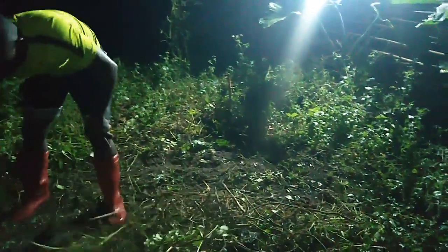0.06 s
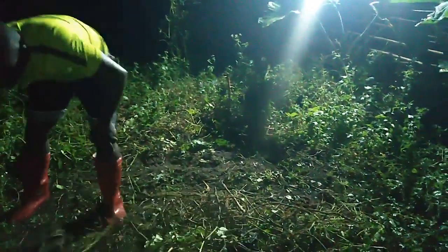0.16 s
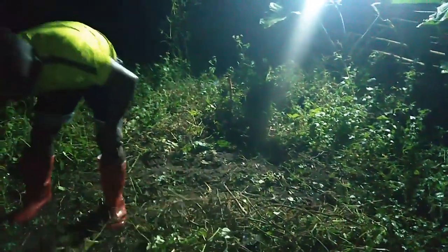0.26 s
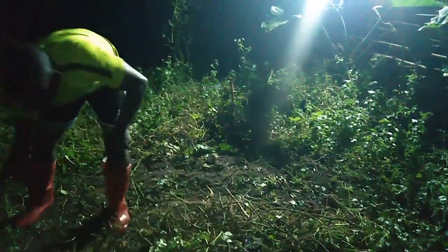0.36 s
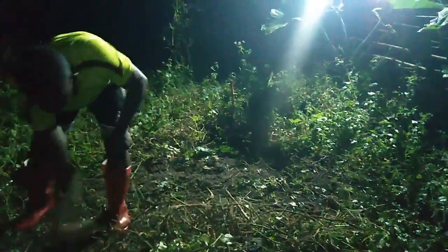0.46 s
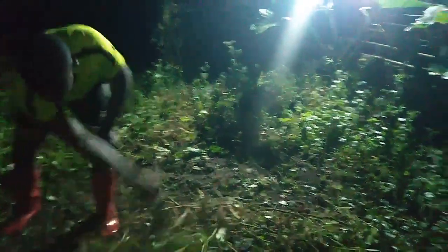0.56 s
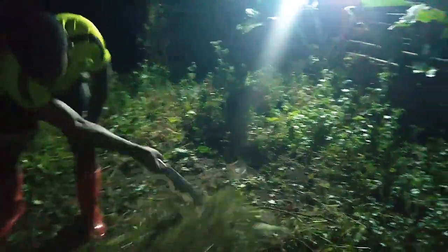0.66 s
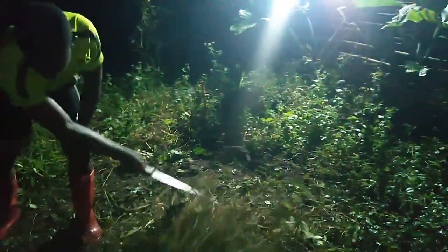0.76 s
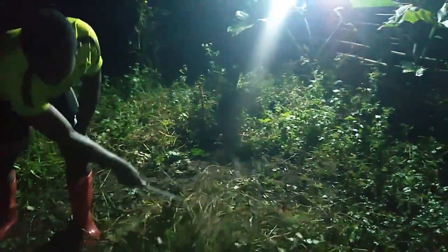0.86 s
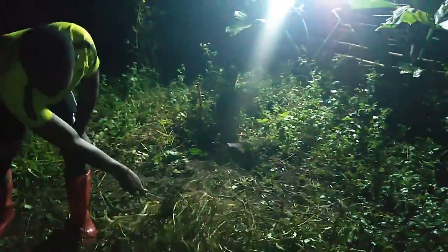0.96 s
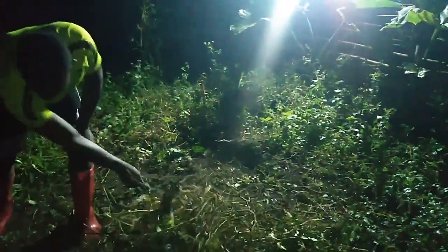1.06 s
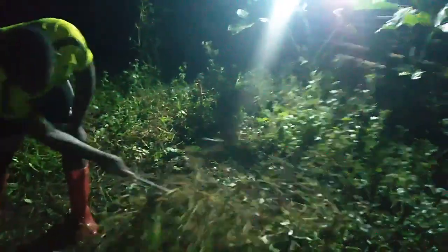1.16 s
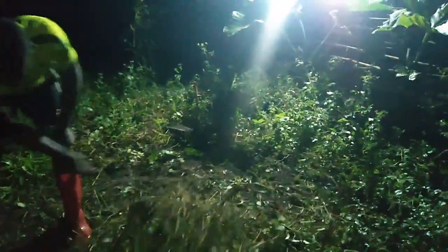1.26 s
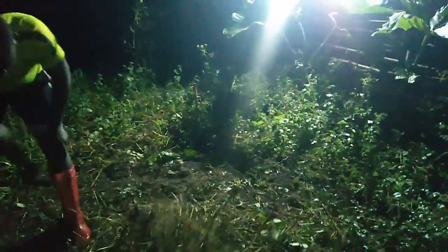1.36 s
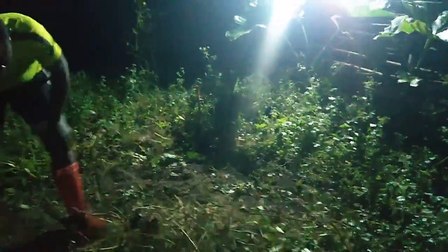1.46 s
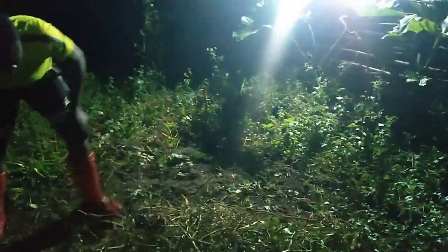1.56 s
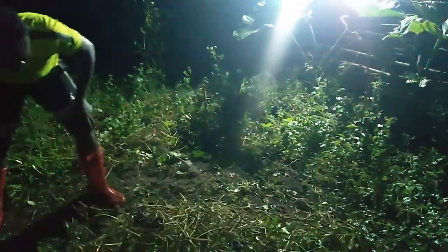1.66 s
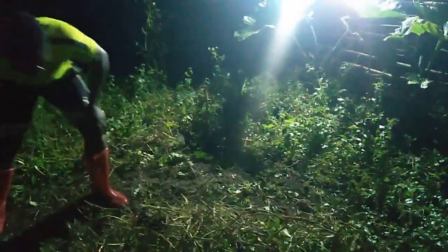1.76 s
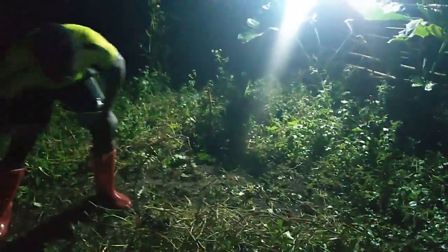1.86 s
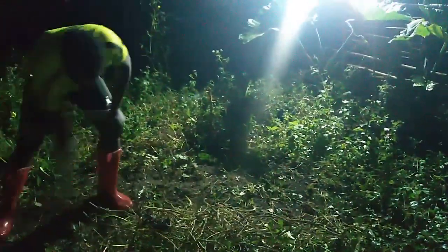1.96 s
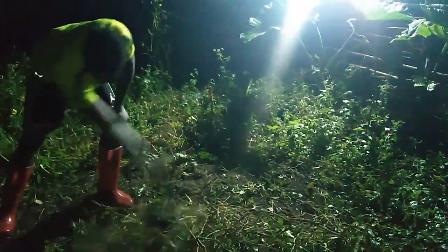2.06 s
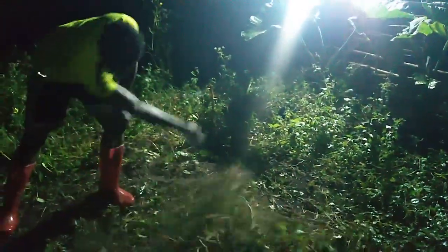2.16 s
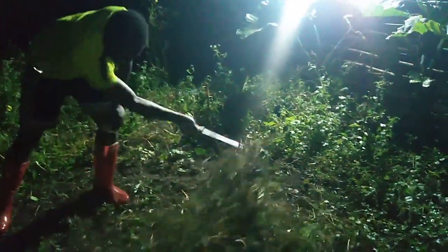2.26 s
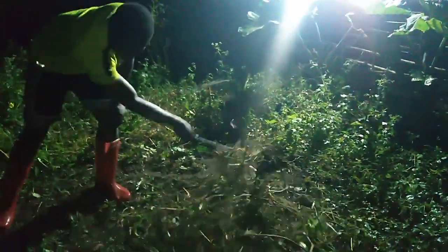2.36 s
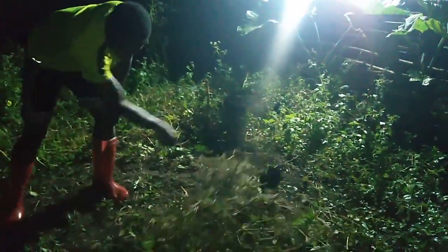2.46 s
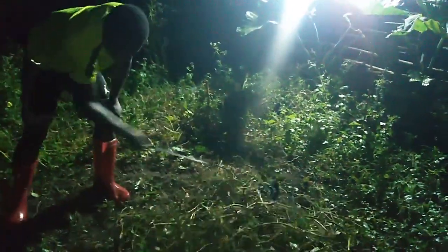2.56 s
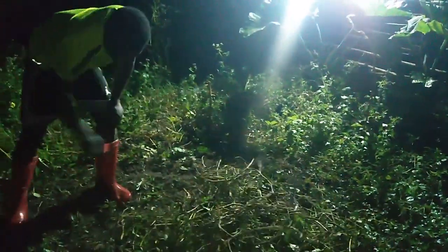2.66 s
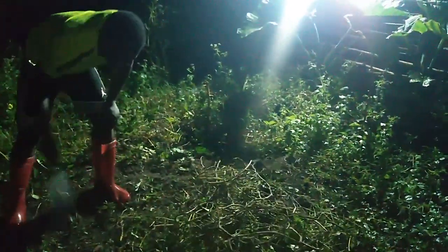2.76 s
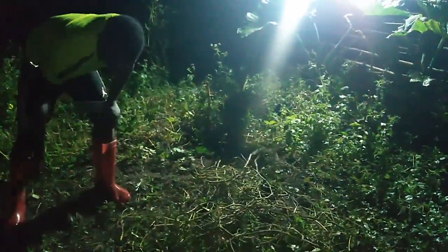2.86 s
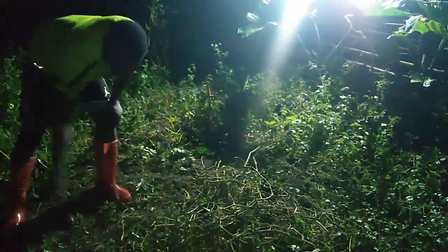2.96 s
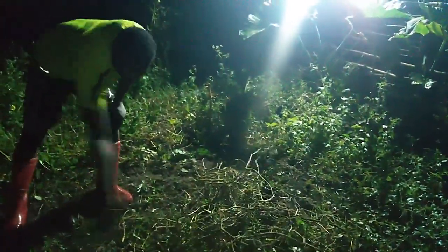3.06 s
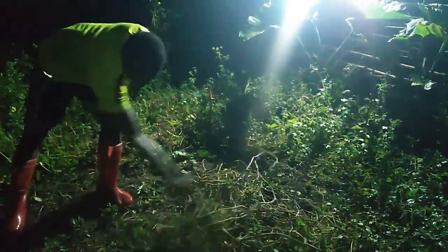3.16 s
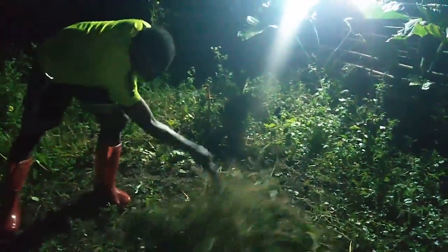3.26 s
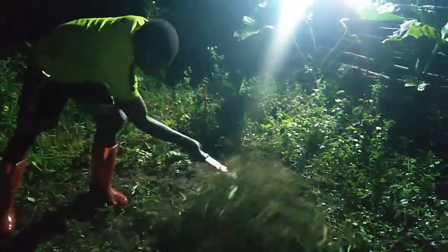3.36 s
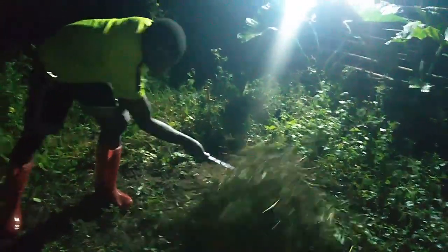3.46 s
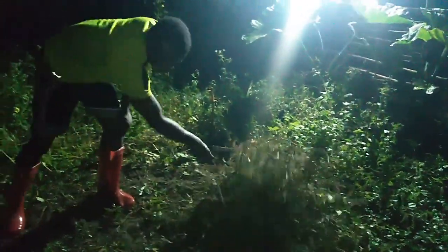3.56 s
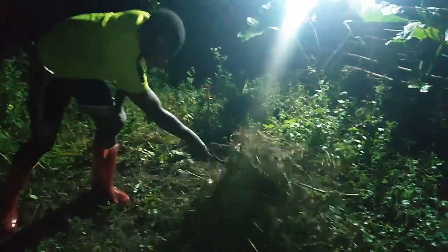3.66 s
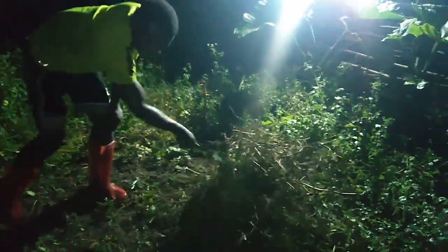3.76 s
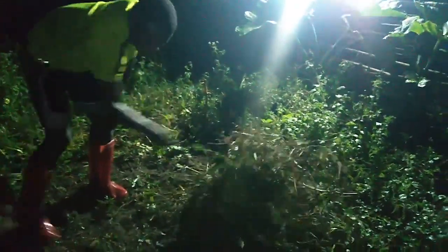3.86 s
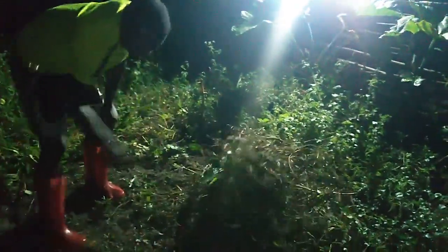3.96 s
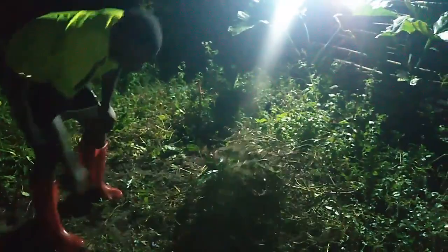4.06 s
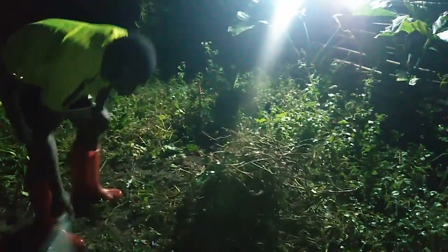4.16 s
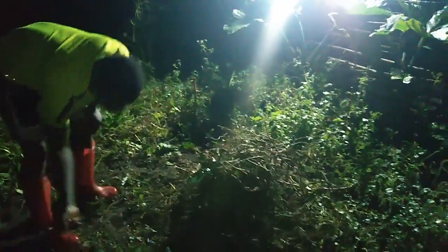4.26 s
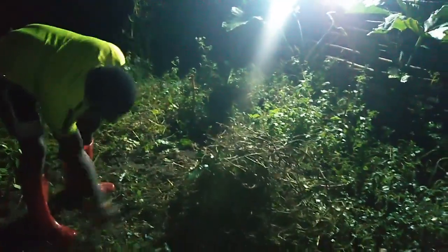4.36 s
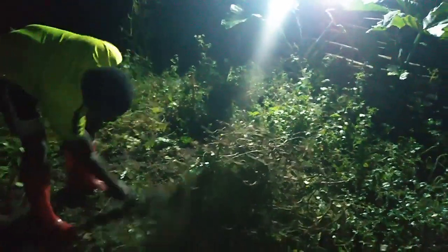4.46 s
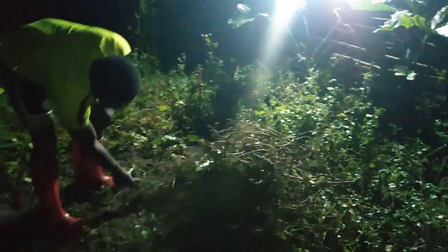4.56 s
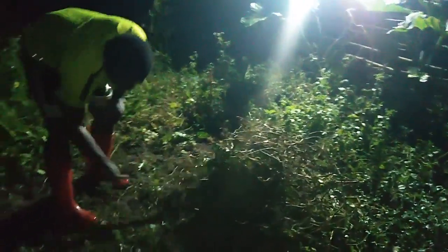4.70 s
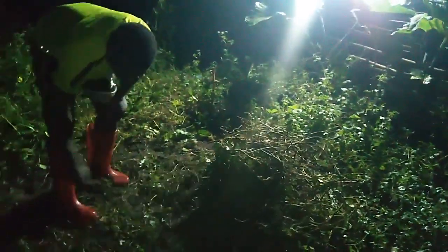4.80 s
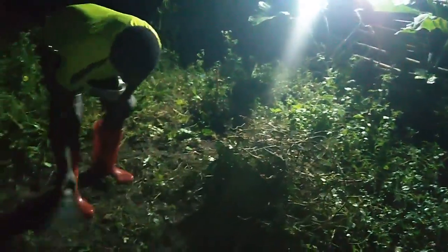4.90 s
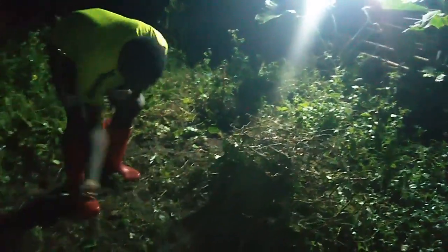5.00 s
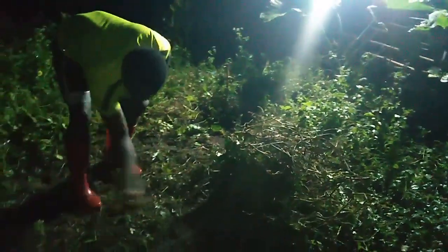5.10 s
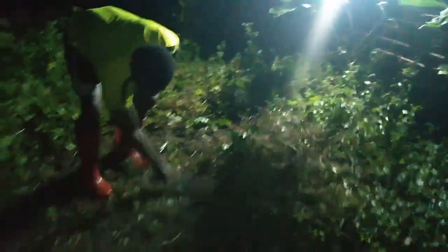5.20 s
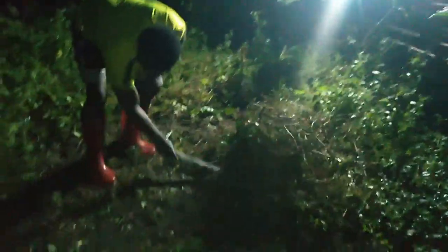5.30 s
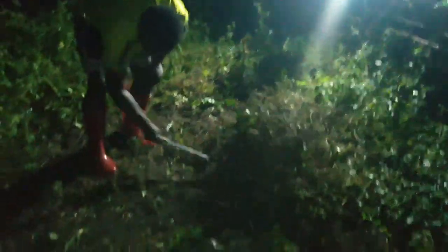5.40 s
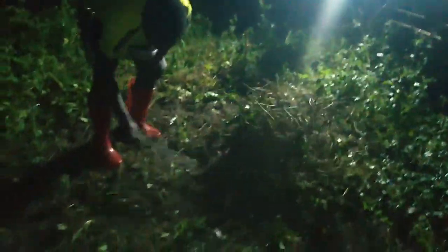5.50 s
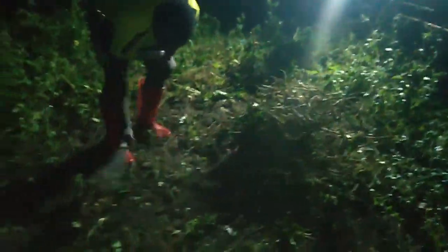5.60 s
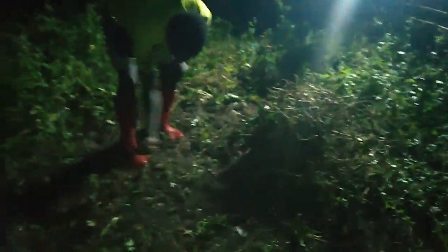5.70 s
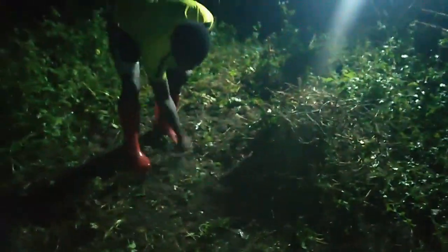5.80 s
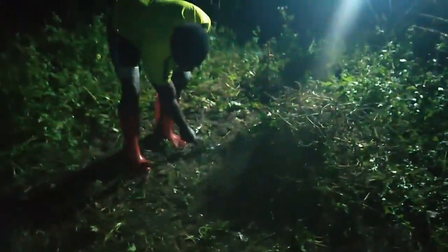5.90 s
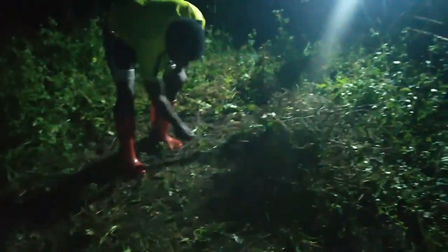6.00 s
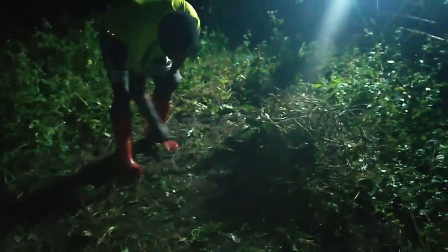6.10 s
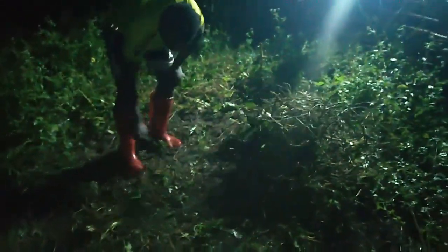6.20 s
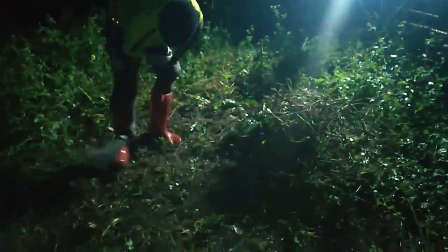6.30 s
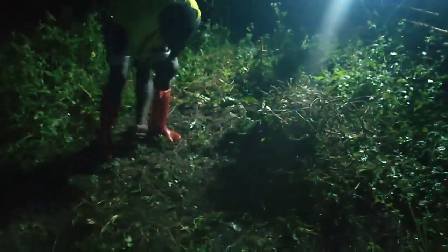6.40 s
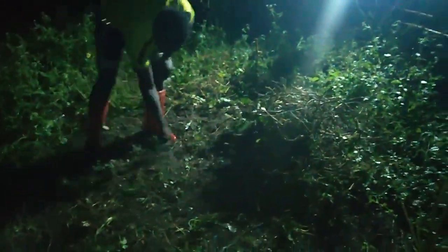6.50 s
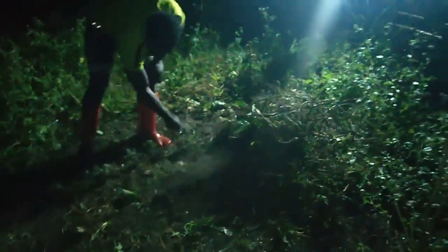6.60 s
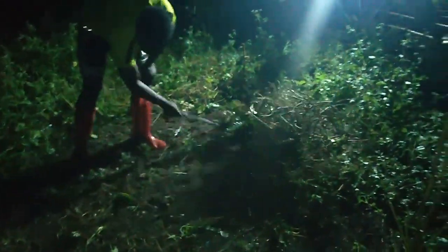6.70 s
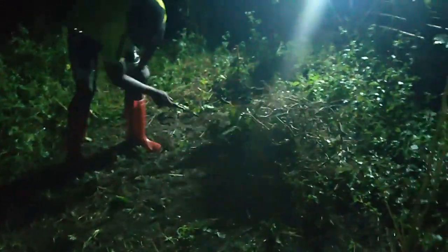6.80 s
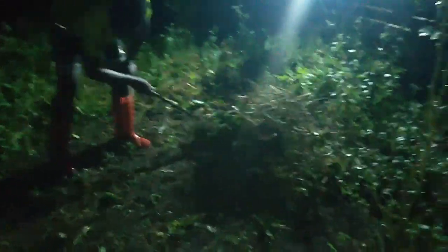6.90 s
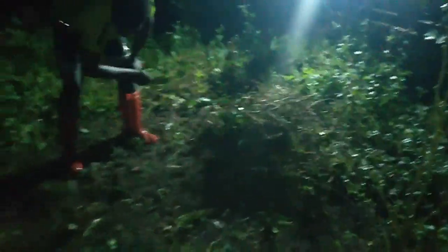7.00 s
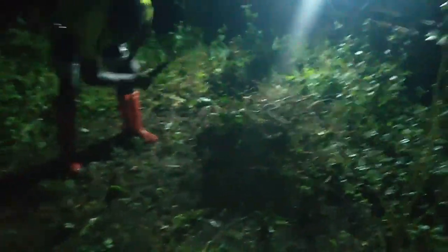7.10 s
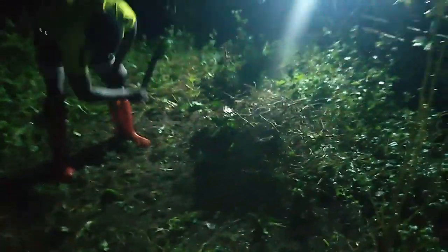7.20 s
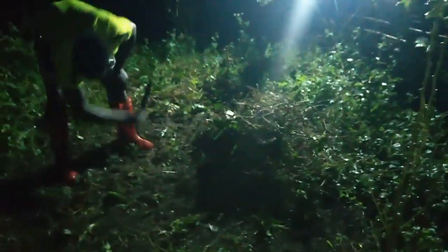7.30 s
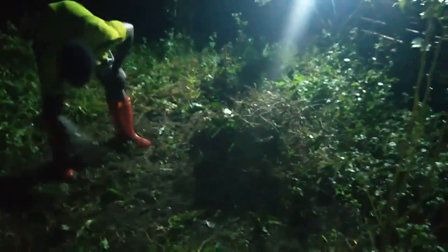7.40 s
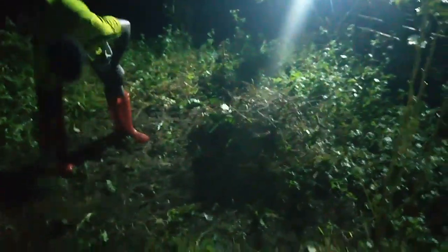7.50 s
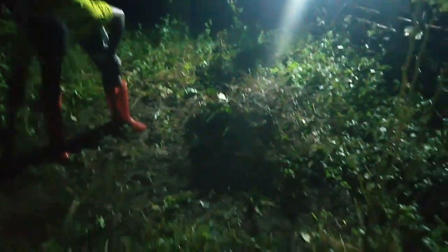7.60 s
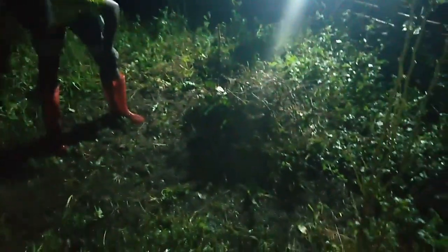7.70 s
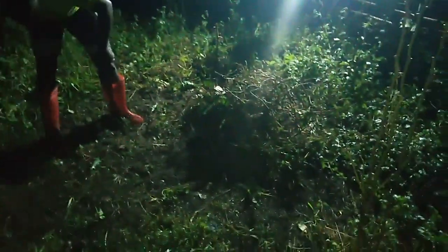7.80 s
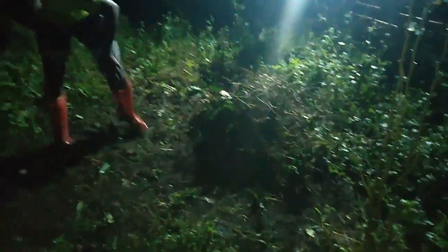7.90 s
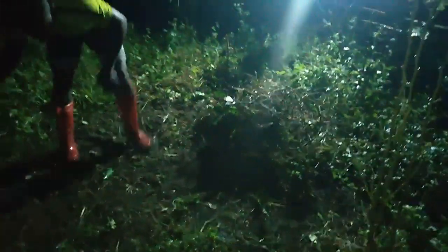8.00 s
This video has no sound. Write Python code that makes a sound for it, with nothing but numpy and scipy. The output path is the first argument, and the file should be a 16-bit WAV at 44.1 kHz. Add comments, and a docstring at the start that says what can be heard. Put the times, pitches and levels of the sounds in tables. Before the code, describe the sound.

Harsh, overloaded slashes through weeds and soil, with leafy rustling between them, over a continuous high insect buzz and a faint low rumble.

```python
"""Night in a plant nursery: two bush crickets buzz on the left from the start, over a low rumble and a far chorus.
Boots and blade drag through cut weeds before and between eight blade strokes, and weeds patter down after each.
Stem snaps, knocks, faint hoots and close chirps fall among them, with one heavy step midway.
Crackles are tiny random clicks, the buzz is noise ringing in wing resonances, chirps are short pure tones.
The microphone ports ring in the treble, and the strokes overload the recorder."""
import sys
import numpy as np
from scipy import signal
from scipy.fft import rfft, irfft, next_fast_len
from scipy.io import wavfile
from scipy.ndimage import uniform_filter1d

SR = 44100
rng = np.random.default_rng(int(sys.argv[2]) if len(sys.argv) > 2 else 0)


def transcribe(u):
    """Save the signal u as a 16-bit wav file named by the first command-line argument.

    u: samples, shape (n,) or (channels, n), limited to [-1, 1]; the rate is SR.
    q: integer samples, one column per channel.
    """
    v = np.clip(np.atleast_2d(u).T, -1, 1)
    q = np.round(v * 32767).astype(np.int16)
    wavfile.write(sys.argv[1], SR, q)


N = 355005
T = np.arange(N) / SR
HZ = np.fft.rfftfreq(next_fast_len(N), 1 / SR)

# sound colour of breaking stems: (f/Hz, level per Hz/dB)
STEM_SPECTRUM = [(150, -27), (600, -11.5), (1500, -7.5), (3000, -4), (5000, 3), (7000, -0.5), (10000, 1.5),
                 (14000, 4), (16000, -20)]
# sound colour of moving soil: (f/Hz, level per Hz/dB)
SOIL_SPECTRUM = [(100, -20.5), (280, 7.5), (480, -9), (720, 3.5), (1200, 1), (1900, 1), (2600, -1),
                 (3300, -0.5), (4500, 6), (7000, -26), (14000, -42)]


def gain_of(db):
    """Turns decibels into an amplitude factor."""
    return 10 ** (np.asarray(db) / 20)


def evened(x):
    """Scales a sound to an average strength (rms) of 1."""
    return x / np.sqrt(np.mean(x ** 2) + 1e-20)


def spectrum_gain(points):
    """Reads a spectrum table as a gain at every frequency, with straight lines over log frequency."""
    hz, db = np.transpose(points)
    return gain_of(np.interp(np.log(HZ + 1), np.log(hz), db))


def filtered(x, response):
    """Weakens or boosts each frequency of a sound by a given response."""
    size = next_fast_len(N)
    return irfft(rfft(x, size) * response, size)[..., :N]


def drift(hz):
    """Slow random wandering of rms 1; a larger hz makes it wander faster."""
    return evened(filtered(rng.standard_normal(N), np.exp(-(HZ / hz) ** 2)))


def add(mix, start_s, sound):
    """Mixes a stereo sound in at a given time."""
    part = mix[:, round(start_s * SR):][:, :sound.shape[1]]
    part += sound[:, :part.shape[1]]


def stereo_noise(spectrum, spread):
    """Coloured noise: one part shared by both ports plus a part that differs between them."""
    noise = rng.standard_normal((3, N))
    both = noise[0] + spread * noise[1:]
    return evened(filtered(both, spectrum_gain(spectrum)))


def crackle(spectrum, per_s, size_db, ring_s, spread, count=10):
    """Tiny fractures of uneven size at several places, each place with its own ring and delay between the ports."""
    t, out = T[:512], np.zeros((2, N))
    for delay in np.arange(count) - 2 * count // 3:  # in samples
        happens = rng.random(N) < per_s / count / SR
        size = gain_of(size_db * np.minimum(rng.exponential(1, N), 4))
        clicks = happens * rng.choice([-1, 1], N) * size
        noise = rng.standard_normal((3, len(t))) * np.exp(-t / ring_s)
        grain = evened(noise[0] + spread * noise[1:])
        grain = np.pad(grain, ((0, 0), (count, count)))
        grain[1] = np.roll(grain[1], delay)
        out += signal.oaconvolve(clicks[None], grain, axes=1)[:, :N]
    return evened(filtered(out, spectrum_gain(spectrum)))


def patchy(x, db, span_hz, span_s):
    """Colour that keeps changing: random gains, smoothed over neighbouring frequencies and over time."""
    cells_of_sound = signal.stft(x, nperseg=512)[2]
    field = rng.standard_normal(cells_of_sound.shape[1:])
    # smooth the random gains over neighbouring frequencies, then over time
    for axis, cells in enumerate([span_hz * 512 / SR, span_s * SR / 256]):
        field = signal.lfilter([1], [1, -np.exp(-1 / cells)], field, axis=axis)
    changed = cells_of_sound * gain_of(db * evened(field))
    return evened(signal.istft(changed, nperseg=512)[1][:, :N])


def burst(start_s, rise_s, hold_s, t60_s):
    """A loudness curve that swells around its start, holds, then dies away by 60 dB every t60."""
    swell = np.clip((T - start_s) / rise_s + .5, 0, 1) ** 2
    fade = np.clip((T - start_s - hold_s) / t60_s, 0, 3)
    return swell * gain_of(-60 * fade)


def distant_rumble():
    """A deep murmur: low-pitched noise whose level wanders slowly, with a faint insect line near 3.2 kHz
    carried along in it."""
    # colour of the rumble, with a faint insect line near 3200 Hz: (f/Hz, level per Hz/dB)
    rumble_spectrum = [(20, -24.5), (40, -20.5), (65, -1), (85, 3.5), (130, 1), (200, -6), (280, -16.5),
                       (400, -42), (700, -34.5), (1000, -49.5), (2600, -55), (3200, -41.5), (3800, -61),
                       (9000, -82.5), (15000, -60)]
    return gain_of(-44.0 + 1.0 * drift(6.7)) * stereo_noise(rumble_spectrum, spread=0.4)


def distant_chorus():
    """Many insects far off on all sides blur into a wide band of noise."""
    # colour of the chorus: (f/Hz, level per Hz/dB)
    chorus_spectrum = [(4800, -32.5), (5500, -30.5), (6000, -4.5), (6200, 3), (6650, -24.5), (7200, 5.5),
                       (7500, -16), (8200, -20.5), (9000, -38.5)]
    return gain_of(-43.5) * stereo_noise(chorus_spectrum, spread=8.4)


def buzz(wing, per_s, scrape_share, ring_on_share, evenness):
    """The wings close many times a second; the scrape of the file rings each wing resonance, and echoes fill the gaps."""
    turns = np.cumsum(per_s * (1 + .02 * drift(4))) / SR
    closing = ring_on_share + np.exp(-((turns % 1 - .5) / scrape_share) ** 2)
    song = 0
    for hz, width_hz, db in wing:
        detune = 2 * (HZ - hz) / width_hz
        ring = np.exp(-(detune / 4) ** 2) / (1 + 1j * detune) ** 2
        song = song + gain_of(db) * filtered(closing * rng.standard_normal(N), ring)
    # one closing is about as strong as the next
    strength = uniform_filter1d(evened(song) ** 2, size=973)
    strength = uniform_filter1d(strength, size=500)
    return evened(song / (abs(strength) + 1e-4) ** (evenness / 2))


def bush_crickets():
    """Two bush crickets on the left, one buzzing higher than the other, with levels that waver and dip."""
    # wing resonances of the high buzz: (f/Hz, width/Hz, level/dB)
    high_wing = [(7103, 110, 0), (6935, 85, -7.5), (6765, 90, -18), (8110, 190, -23)]
    # wing resonances of the low buzz: (f/Hz, width/Hz, level/dB)
    low_wing = [(6218, 95, 0), (5980, 165, -5.5), (5770, 110, -18)]
    # slow course of the song: (t/s, high buzz level/dB, low buzz level/dB)
    song_levels = [(0, -18.5, -26.5), (1.45, -17.5, -26.5), (3.2, -20, -28), (5.2, -19.5, -28.5),
                   (7.0, -21, -31), (8.05, -19.5, -26.5)]
    # moments when they falter: (t/s, length/s, high buzz change/dB, low buzz change/dB)
    lulls = [(0.79, 0.41, -2.5, -2), (1.68, 0.1, -5.5, -11), (2.366, .15, -3.5, -5), (3.704, .17, 0.5, -3),
             (3.945, 0.44, -2, 1), (4.695, .2, -1, -5), (5.44, 0.46, -1, -3), (5.604, 0.048, -11, -2),
             (6.15, 0.16, -7, -10), (6.294, 0.28, -4, -2.5), (6.94, 0.22, -3.5, -1)]
    lull_edge_s, waver_db, waver_hz = 0.077, 1.0, 12
    times, *levels = np.transpose(song_levels)
    high_db, low_db = (np.interp(T, times, db) + waver_db * drift(waver_hz) for db in levels)
    for s, length_s, high_change_db, low_change_db in lulls:
        to_nearest_end_s = np.minimum(T - s, s + length_s - T)
        lull = np.clip(to_nearest_end_s / lull_edge_s + .5, 0, 1)
        high_db = high_db + high_change_db * lull
        low_db = low_db + low_change_db * lull
    high = gain_of(high_db) * buzz(high_wing, per_s=45.3, scrape_share=.2, ring_on_share=.45, evenness=.6)
    low = gain_of(low_db) * buzz(low_wing, per_s=45, scrape_share=.12, ring_on_share=.42, evenness=.85)
    right = gain_of(-34.5) * high + gain_of(-31.5) * low
    return np.array([high + low, right])


def far_chirpers(per_s, length_s, low_hz, high_hz, count=14):
    """Farther crickets give short pure chirps at random times, each at its own pitch and place."""
    out, t = np.zeros((2, N)), T[:3000]
    for hz in np.linspace(low_hz, high_hz, count):
        happens = rng.random(N) < per_s / count / SR
        calls = happens * gain_of(1.3 * rng.standard_normal(N))
        swell = (t / length_s) ** 2 * np.exp(-t / length_s)
        chirp = swell * np.sin(2 * np.pi * hz * t)
        place = gain_of(1 * rng.standard_normal((2, 1)))
        out += place * signal.oaconvolve(calls, chirp)[:N]
    return evened(out)


def litter():
    """Flung leaves, stalks and crumbs of soil patter down ever more thinly, then settle; boots and blade drag through them."""
    # boots and blade dragging through cut weeds: (t/s, length/s, leaf level/dB, soil crumb level/dB)
    drags = [(0.0, 0.31, -34.5, -43), (0.224, 0.046, -34.5, -38.5), (1.1, 0.089, -43, -49),
             (1.198, 0.29, -41.5, -47), (1.61, 0.15, -57.5, -57), (2.528, 0.16, -39.5, -62),
             (3.979, 0.078, -39.5, -33.5), (4.145, 0.059, -71, -51.5), (4.855, 0.16, -49, -60),
             (5.09, .05, -49.5, -59.5), (5.184, 0.021, -34.5, -29), (5.82, 0.056, -41.5, -58.5),
             (6.3, 0.089, -58, -56.5), (6.442, 0.095, -40, -39.5), (6.868, 0.19, -40, -57.5),
             (7.8, 0.071, -45, -51), (7.98, 0.085, -44, -68)]
    # weeds flung by each stroke coming down: (t/s, time in the air/s, leaf level/dB, soil crumb level/dB)
    showers = [(.61, 0.42, -25.5, -27.5), (2.188, 0.61, -28, -28.5), (3.30, .55, -25, -29),
               (4.56, 0.38, -30, -32), (5.31, 0.15, -32, -34), (5.99, .14, -32, -48),
               (6.679, 0.12, -34, -38.5), (7.64, 0.2, -34.5, -45)]
    # colour of loose leaves: (f/Hz, level per Hz/dB)
    loose_leaf_spectrum = [(200, -11.5), (450, -22), (700, -13.5), (1300, -27.5), (2300, -14),
                           (3100, -24.5), (4300, 7), (5200, 0), (7500, -1), (10000, 4), (14000, -4.5),
                           (15000, -46)]
    # colour of stiff stalks rubbing among the leaves: (f/Hz, level per Hz/dB)
    stalk_spectrum = [(400, -18), (900, -5), (1400, -1), (2400, 1), (3100, -7), (4500, -6), (7000, -22)]
    drag_rise_s, drag_leaf_t60_s, drag_soil_t60_s = .045, .4, .26
    shower_rise_s, thinning_db_per_s = .08, 28.5
    # once the last piece has landed, soil lies still sooner than leaves do
    leaf_settle_t60_s, soil_settle_t60_s = .68, .36

    leaf_power = soil_power = 0
    for s, length_s, leaf_db, soil_db in drags:
        leaf = gain_of(leaf_db) * burst(s, drag_rise_s, length_s, drag_leaf_t60_s)
        soil = gain_of(soil_db) * burst(s, drag_rise_s, length_s, drag_soil_t60_s)
        leaf_power = leaf_power + leaf ** 2
        soil_power = soil_power + soil ** 2
    for s, air_s, leaf_db, soil_db in showers:
        thinning_db = -thinning_db_per_s * np.clip(T - s, 0, air_s)
        leaf = gain_of(leaf_db + thinning_db) * burst(s, shower_rise_s, air_s, leaf_settle_t60_s)
        soil = gain_of(soil_db + thinning_db) * burst(s, shower_rise_s, air_s, soil_settle_t60_s)
        leaf_power = leaf_power + leaf ** 2
        soil_power = soil_power + soil ** 2

    leaves = crackle(loose_leaf_spectrum, per_s=4500, size_db=3, ring_s=.0006, spread=.7)
    stalks = crackle(stalk_spectrum, per_s=900, size_db=3, ring_s=.0025, spread=1.2)
    crumbs = crackle(SOIL_SPECTRUM, per_s=1300, size_db=3, ring_s=.0022, spread=1)
    leaves = patchy(leaves, db=2.5, span_hz=150, span_s=.025)
    stalks = patchy(stalks, db=7, span_hz=150, span_s=.04)
    crumbs = patchy(crumbs, db=5.5, span_hz=170, span_s=.03)
    leaf_level = np.sqrt(leaf_power) * gain_of(1.3 * drift(25))
    soil_level = np.sqrt(soil_power) * gain_of(1.6 * drift(25))
    # stalks rub most where both leaves and soil are moving
    stalk_level = gain_of(-9) * np.sqrt(leaf_level * soil_level)
    return leaf_level * leaves + stalk_level * stalks + soil_level * crumbs


def blade_strokes():
    """The blade brushes leaves, shears stems and thumps the soil; cut weeds swish on in a spray of earth."""
    # (t/s, bite level/dB, bite length/s, swish level/dB, swish t60/s, thud level/dB, earth spray level/dB)
    stroke_table = [(0.526, -3.5, 0.03, -11, 1, -20.5, -20.5), (2.1, -4.5, 0.044, -6.5, 0.73, -24.5, -19.5),
                    (3.208, -2.5, 0.033, -9, 0.86, -18, -17.5), (4.471, -2, 0.015, -9.5, 0.77, -20.5, -24),
                    (5.222, 3.5, 0.021, -5.5, 0.53, -17.5, -25.5), (5.9, 3, 0.023, -3, 0.39, -12.5, -23),
                    (6.595, 8.5, 0.0063, -6.5, 0.51, -18.5, -27), (7.547, 5.5, 0.027, -5, 0.39, -17.5, -41)]
    # colour of swishing leaves: (f/Hz, level per Hz/dB)
    leaf_spectrum = [(200, -14), (700, -19), (2000, -11.5), (3300, -2), (5000, -2), (7500, 0.5),
                     (10000, -4), (14000, -6), (15000, -49)]
    # colour of the thump on the soil: (f/Hz, level per Hz/dB)
    thud_spectrum = [(25, -7), (70, 0.5), (230, 3.5), (450, -3), (900, -2), (1800, -13.5), (4000, -23.5)]
    bite = swish = thud = spray = 0
    for s, bite_db, length_s, swish_db, swish_t60_s, thud_db, spray_db in stroke_table:
        brush = gain_of(-20) * burst(s - .007, .008, .01, .03)
        shear = burst(s + .002, .009, length_s, .07)
        accent = .6 * burst(s + .005, .007, .004, .05)
        bite = bite + gain_of(bite_db) * (brush + shear + accent)
        swish = swish + gain_of(swish_db) * burst(s + .012, .02, .02, swish_t60_s)
        thud = thud + gain_of(thud_db) * burst(s + 0.004, 0.019, length_s / 2, 0.074)
        spray = spray + gain_of(spray_db) * burst(s + .016, .04, .035, swish_t60_s)
    stems = crackle(STEM_SPECTRUM, per_s=3000, size_db=4.5, ring_s=.0006, spread=.6)
    leaves = crackle(leaf_spectrum, per_s=9000, size_db=2.5, ring_s=.0007, spread=.7)
    earth = crackle(SOIL_SPECTRUM, per_s=1500, size_db=3.3, ring_s=.0015, spread=.8)
    stems = patchy(stems, db=3, span_hz=200, span_s=.012)
    leaves = patchy(leaves, db=1.5, span_hz=150, span_s=.025)
    earth = patchy(earth, db=4, span_hz=170, span_s=.02)
    # random flutter in level, plus a fixed level for left and right
    stems = bite * gain_of(1.75 * drift(98) + [[-6], [-1]]) * stems
    leaves = swish * gain_of(1 * drift(50) + [[-5.5], [-5]]) * leaves
    return stems + leaves + spray * earth + thud * stereo_noise(thud_spectrum, spread=.45)


def stem_snaps():
    """A single stem snaps or brushes the blade in a brief shower of tearing fibres."""
    # (t/s, level/dB, t60/s)
    snap_table = [(0.7292, -15, 0.07), (1.2274, -35, 0.1), (2.5854, -24, 0.1), (4.0433, -41, 0.043),
                  (5.1144, -38, 0.077), (5.779, -19, 0.11), (6.471, -25.5, 0.083), (7.1396, -43, 0.061),
                  (7.2944, -48.5, 0.092), (7.6984, -27, 0.062)]
    level = sum(gain_of(db) * burst(s + 0.00033, 0.0024, 0.00098, t60_s) for s, db, t60_s in snap_table)
    return level * crackle(STEM_SPECTRUM, per_s=4400, size_db=-2.5, ring_s=0.0019, spread=1.0)


def ground_knocks():
    """Each knock is a dull puff of noise in one broad resonance, with a faint, slower echoing tail."""
    # boots, clods and stones on the ground: (t/s, peak level/dB, f/Hz, t60/s)
    knock_table = [(0.733, -18.5, 1620, 0.044), (0.905, -32, 1140, 0.14), (1.045, -34.5, 2700, 0.13),
                   (1.14, -45, 1900, 0.06), (1.254, -32.5, 1830, 0.085), (1.544, -34.5, 920, 0.05),
                   (1.646, -36.5, 1070, 0.08), (1.698, -29.5, 272, 0.07), (1.734, -35, 243, 0.065),
                   (1.753, -24.5, 282, 0.065), (1.764, -42, 1350, 0.05), (2.783, -38, 1040, 0.036),
                   (2.914, -42.5, 990, 0.05), (3.316, -8.5, 2620, 0.052), (3.891, -32.5, 1780, 0.055),
                   (3.995, -28, 725, 0.08), (4.04, -14, 300, 0.05), (4.125, -33, 280, 0.054),
                   (4.454, -27.5, 2460, 0.02), (5.195, -15, 614, 0.01), (5.368, -17, 2230, 0.072),
                   (5.426, -27.5, 750, 0.046), (6.407, -31, 1720, 0.087), (6.422, -16, 1600, 0.026),
                   (7.22, -49, 1600, 0.052), (7.805, -31, 2080, 0.41)]
    out, t = np.zeros((2, N)), T[:8000]
    for s, db, hz, t60_s in knock_table:
        noise = rng.standard_normal((3, len(t)))
        puff = gain_of(-60 * t / t60_s)
        echo_tail = gain_of(-19.5 - 60 * t / 0.7)
        push = (noise[0] + 0.52 * noise[1:]) * (puff + echo_tail)
        resonance = signal.butter(3, [hz / 1.5, hz * 1.35], "band", fs=SR)
        knock = signal.lfilter(*resonance, push)
        add(out, s, gain_of(db) * knock / abs(knock).max())
    return out


def far_hoots():
    """Something far off hoots faintly, each hollow note sagging in pitch and blurred by random wandering."""
    # (t/s, length/s, level/dB, starting f/Hz)
    hoot_table = [(1.307, 0.09, -51.5, 640), (2.943, 0.13, -57.5, 678), (4.15, 0.051, -52, 600),
                  (7.003, 0.047, -56, 631)]
    width_hz, sag_hz_per_s, rise_s, t60_s = 69, 310, 0.039, 0.53
    out = 0
    for s, length_s, db, hz in hoot_table:
        pitch_hz = hz - sag_hz_per_s * np.clip(T - s, 0, length_s)
        turns = np.cumsum(pitch_hz) / SR
        level = gain_of(db) * burst(s, rise_s, length_s, t60_s)
        out = out + level * np.exp(2j * np.pi * turns)
    return (out * (drift(width_hz) + 1j * drift(width_hz))).real


def near_chirps():
    """A cricket close on the left breaks in with single pure pulses."""
    # (t/s, peak level on the left/dB, f/Hz)
    chirp_table = [(1.347, -33, 7600), (1.437, -19, 6740), (1.826, -22, 6600), (3.538, -13, 7100),
                   (4.836, -31, 6900), (5.712, -11, 7200), (7.353, -22, 6460), (7.376, -24, 6760),
                   (7.395, -27, 6590), (7.455, -19.5, 6780)]
    out, t = np.zeros((2, N)), T[:3000]
    swell = (t / .004) ** 2 * np.exp(-t / 0.0066)
    for s, db, hz in chirp_table:
        level = gain_of(db + np.array([[0], [-20]]))  # left, right
        add(out, s, level * swell / swell.max() * np.sin(2 * np.pi * hz * t))
    return out


def heavy_step():
    """One boot comes down heavily: a swell of deep noise that dies away."""
    # colour of the step: (f/Hz, level per Hz/dB)
    boot_spectrum = [(30, -19), (70, 8), (150, 2), (330, -8.5), (600, -37.5), (2000, -53)]
    level = gain_of(-34.5) * burst(3.95, 0.095, 0.18, 0.81)
    return level * stereo_noise(boot_spectrum, spread=0.28)


def through_ports(sound):
    """The two small microphone ports ring, which colours left and right differently in the treble."""
    # left port: (f/Hz, gain/dB)
    left_port = [(1000, -3.5), (2000, -2.5), (2800, -4.5), (4300, -1.5), (5000, 3), (6000, 6.5), (7200, 11),
                 (8200, 11.5), (10000, 4), (14000, -4)]
    # right port: (f/Hz, gain/dB)
    right_port = [(1000, -4.5), (1900, -3.5), (2600, -0.5), (3200, -7.5), (4800, -3.5), (5400, 1.5),
                  (6300, 6.5), (7100, 0), (8200, -7), (10000, -8), (14000, -17)]
    return filtered(sound, np.array([spectrum_gain(left_port), spectrum_gain(right_port)]))


def scene():
    """The work, heard through the two ringing ports, among insects and a distant rumble."""
    chirpers = far_chirpers(per_s=45, length_s=.004, low_hz=6150, high_hz=6900) * gain_of([[-40], [-44]])
    insects = bush_crickets() + near_chirps() + chirpers + distant_chorus()
    work = through_ports(litter() + blade_strokes() + stem_snaps() + ground_knocks())
    return distant_rumble() + insects + work + far_hoots() + heavy_step()


def record(dry):
    """A quick limiter led by the louder channel, then clipping at full scale and a cut of the highest treble."""
    power = uniform_filter1d(dry ** 2, size=130, axis=1)
    power_db = 10 * np.log10(abs(power).max(0) + 1e-12)
    # the held level follows rises at once and falls by 400 dB a second
    recovery_db = 400 * T
    held_db = np.maximum.accumulate(power_db + recovery_db) - recovery_db
    over_db = np.maximum(held_db - 3.0, 0)
    limited = dry / gain_of(uniform_filter1d(over_db, size=60))
    clipped = np.clip(limited, -1, 1)
    edge_hz = 15600
    low_pass = signal.firwin(255, edge_hz, window=("kaiser", 8), fs=SR)
    return signal.oaconvolve(clipped, low_pass[None], "same")


dry = scene()
out = record(dry)
transcribe(out)
```